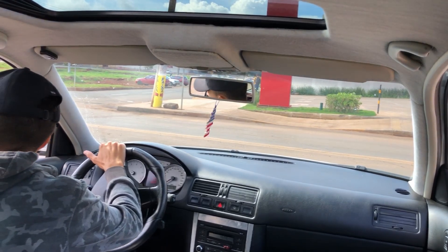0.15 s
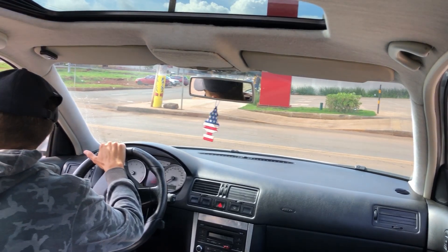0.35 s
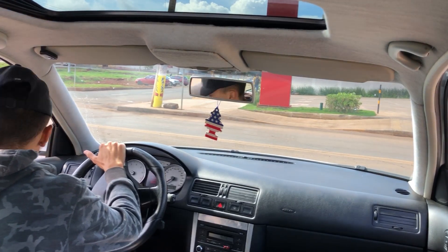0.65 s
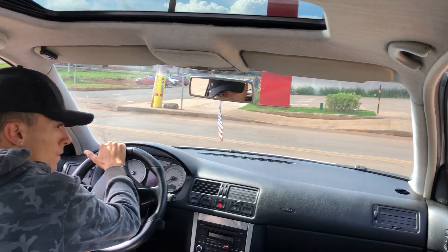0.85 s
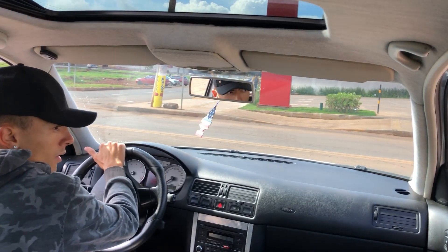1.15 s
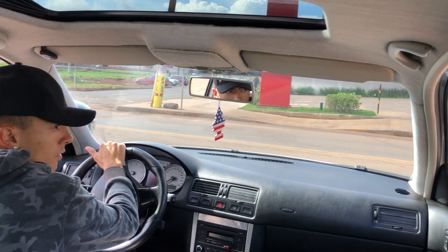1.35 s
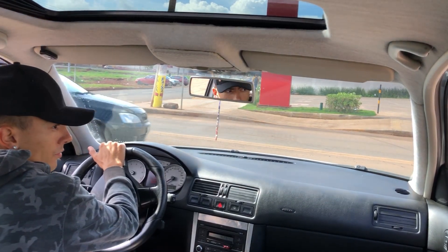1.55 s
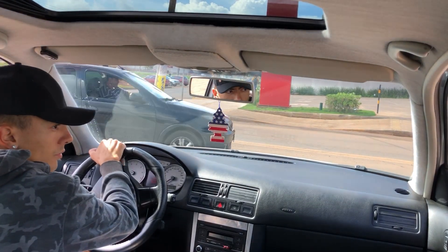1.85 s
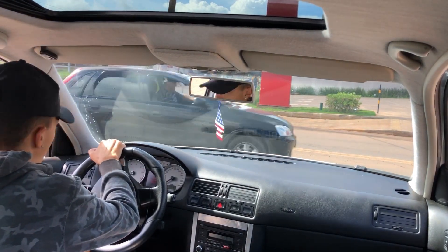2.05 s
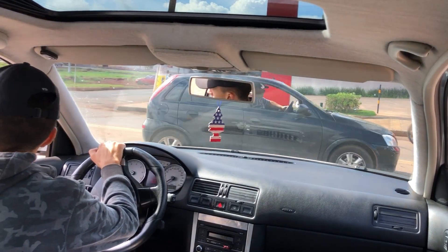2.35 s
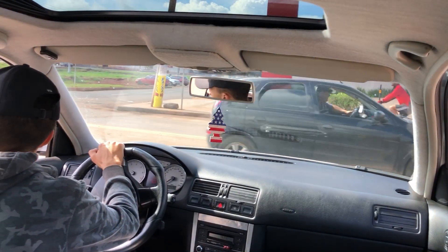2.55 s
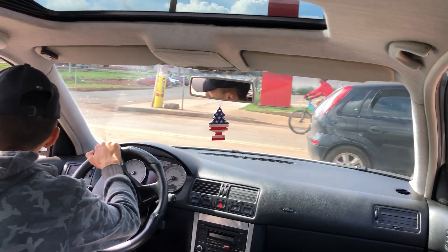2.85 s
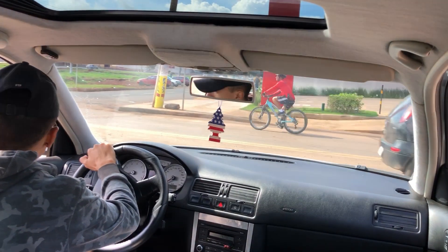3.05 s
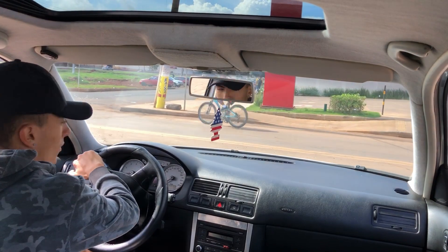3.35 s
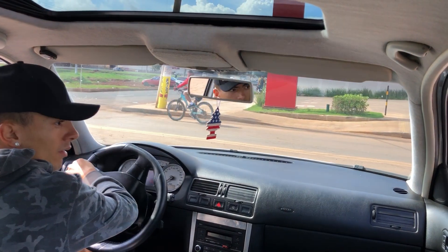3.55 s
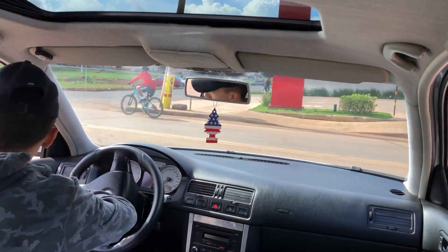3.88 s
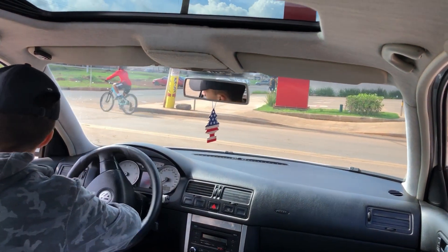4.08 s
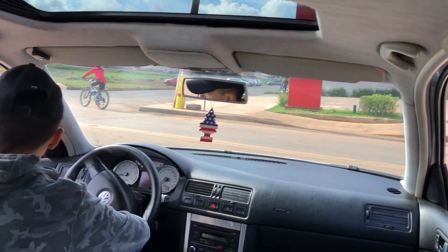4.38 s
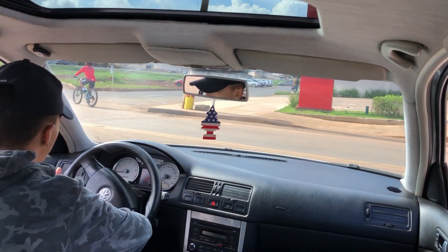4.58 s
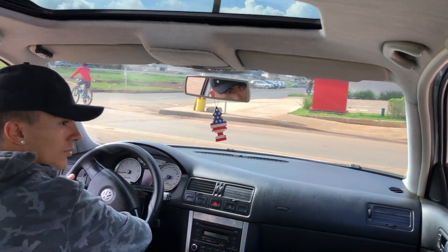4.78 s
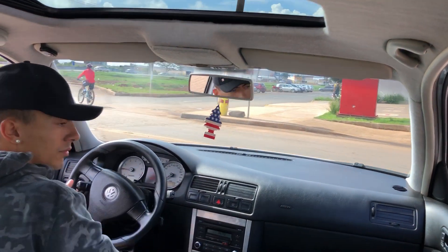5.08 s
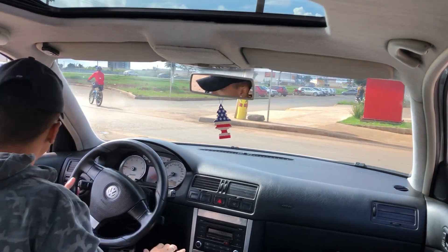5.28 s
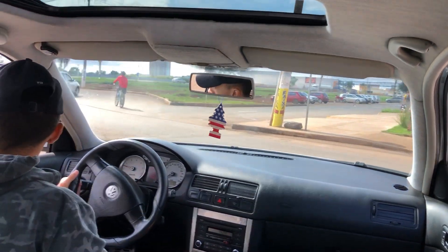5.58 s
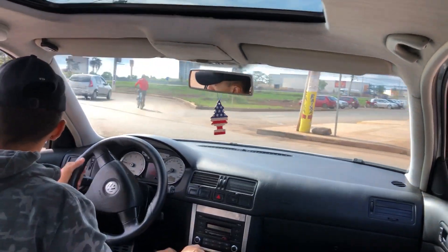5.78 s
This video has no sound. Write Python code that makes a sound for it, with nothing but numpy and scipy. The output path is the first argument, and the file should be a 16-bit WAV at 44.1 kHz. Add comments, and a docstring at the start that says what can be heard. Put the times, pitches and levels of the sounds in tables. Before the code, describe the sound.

Low engine idle in a car cabin beats against a passing car's boom; faint squeaks and clicks, then a swelling, droning pull-off.

```python
"""A deep idle boom fills a small car waiting at a junction, joined by another car's boom that beats against it.
The idle is a set of sines locked to the firings; it revs up into a cabin resonance and pulls away, droning
panels. The crossing car adds a pulsing band of noise; tyres and ventilation are soft coloured noise. Unsteady
sines hum and whine, stick-slip tones squeak, noise bursts click, and dying sines give a low tone and soft
knocks."""
import sys
import numpy as np
from scipy import signal
from scipy.io import wavfile

SR = 44100
rng = np.random.default_rng(int(sys.argv[2]) if len(sys.argv) > 2 else 0)


def wrap_up_sound(samples):
    """Save the sound to the file named by the first command line argument, as 16-bit audio."""
    columns = np.atleast_2d(samples).T
    # keep every value between -1 and 1, then stretch to whole-number steps
    tamed = np.clip(columns, -1, 1)
    steps = np.round(tamed * 32767).astype(np.int16)
    wavfile.write(sys.argv[1], SR, steps)


N = 261072
TIME = np.arange(N) / SR

# colour of the tyre rumble: (frequency [Hz], relative level per Hz [dB])
RUMBLE_COLOUR = [(34, -20), (60, 6), (110, 5), (160, -1), (220, -0.5), (300, -7), (380, -11.5), (500, -11),
                 (700, -28), (1200, -33)]
# colour of the rushing air: (frequency [Hz], relative level per Hz [dB])
RUSH_COLOUR = [(300, 0.5), (500, 3), (660, -3.5), (850, 2), (1080, 0), (1400, -4.5), (2200, -12.5),
               (3800, -16), (6000, -24), (10000, -34.5), (16000, -45)]
# a wavering hum: (time [s], pitch [Hz], level [dB])
HUM_CURVE = [(0, 225.6, -55), (1.3, 224.4, -53), (1.75, 214.1, -45), (2.42, 216, -46.5),
             (2.62, 199.7, -53.5), (2.77, 191, -39), (2.92, 236.8, -59.5), (3.1, 253, -52),
             (3.7, 238.7, -56.5), (4.7, 273.1, -54), (5.2, 257.4, -56)]
# a brief higher hum as the engine gathers speed: (centre [s], half length [s], pitch [Hz], level [dB])
HIGH_HUM_SWELL = (5.79, .075, 490, -49)
# wavering whine near 380 Hz as engine overtones cross a panel resonance: (time [s], pitch [Hz], level [dB])
PANEL_WHINE = [(0, 379, -62), (4.66, 372, -63), (4.76, 381, -51), (4.83, 388, -47), (4.89, 365, -45.5),
               (4.96, 370, -56), (5.05, 378, -54), (5.1, 382, -45), (5.19, 390, -42.5), (5.25, 380, -50),
               (5.33, 376, -46), (5.42, 370, -52), (5.48, 386, -50), (5.62, 366, -55), (5.7, 380, -48),
               (5.8, 376, -44), (5.88, 382, -42.5)]
# brief dying low sines: a low tone at 1.63 s, then two soft knocks: (time [s], level [dB], pitch [Hz], t60 [s])
LOW_DYING_SINES = [(1.63, -29.5, 102, .4), (3.719, -37.5, 315, 0.14), (4.219, -26, 159, 0.097)]
# tyre scrubs: (centre [s], half length [s], level [dB], low edge [Hz], high edge [Hz])
TYRE_SCRUBS = [(2.905, 0.14, -53, 287, 548), (4.5, 0.22, -52, 471, 681.6)]
# trim squeaks, before the treble trim: (centre [s], length scale [s], pitch [Hz], level [dB],
# weight of odd partials [dB], flutter [dB], glide [share of the pitch])
TRIM_SQUEAKS = [(0.225, .05, 435, -50, -20, 2, 0), (0.252, 0.034, 1615, -48.5, -14, 2, -.02),
                (1.03, 0.05, 2112, -50, 1, 2, -.025), (1.249, 0.046, 2046, -42.5, 1, 2, .02),
                (1.3, .035, 2035, -55, -8, 3, .01), (1.447, .04, 612, -48, -20, 2, -.014),
                (1.76, .05, 542, -47, -20, 2, -.014), (3.15, .3, 3660, -67, -20, 4, -.014),
                (4.35, 0.16, 2072, -63, -14, 4.5, 0), (4.46, .035, 2080, -56, -14, 3, 0)]
# plastic clicks, before the treble trim: (time [s], crack level [dB], crack t60 [s], crack low edge [Hz],
# crack high edge [Hz], hollow body level [dB], body low edge [Hz], body high edge [Hz], plastic ring [dB])
PLASTIC_CLICKS = [(1.168, -50, 0.06, 4500, 7500, -42.5, 3450, 4450, -2),
                  (3.5555, -43.5, 0.04, 3000, 15800, -38.5, 2220, 2680, 6),
                  (5.6103, -32.5, 0.01, 1800, 13000, -31, 1250, 3200, -14),
                  (5.635, -59, .05, 3500, 5200, -55, 3000, 5000, -12),
                  (5.701, -53.5, .05, 3500, 12000, -49, 2700, 5000, -6),
                  (5.745, -53.5, .04, 7000, 15500, -54.5, 4900, 6000, -12)]
# modes of the plastic: (frequency [Hz], width [Hz], relative level [dB])
PLASTIC_MODES = [(5850, 280, 1), (6530, 380, 3.5), (8300, 290, -4), (11100, 270, 4.5), (14800, 300, 3)]
# crossing car's hiss, before its puffs and the treble trim: (time [s], level [dB])
PASSING_HISS = [(0.0, -73.5), (0.87, -70), (1.61, -63.5), (2.1, -65.5), (3.05, -61.5), (3.84, -65.5),
                (5.44, -74), (5.92, -72)]
# colour of that hiss: (frequency [Hz], relative level per Hz [dB])
HISS_COLOUR = [(1000, 8), (1800, 4), (2400, -1), (3500, 1), (5000, -2.5), (7300, -6), (10000, -8.5),
               (13000, -12.5), (15500, -4.5)]
# how much faster the crossing car's boom runs than the idle's: (time [s], beat rate [per s])
BEAT_RATE = [(2.6, 3.88), (3.2, 5.64), (3.65, 2.9), (4.5, 2.7)]
# reflections from glass and roof: (delay [s], strength [gain])
CABIN_REFLECTIONS = [(.0023, 0.071), (.0037, -0.22), (.0059, 0.3), (.0086, .18), (0.011, -0.11)]
# engine speed: (time [s], firing rate [per s])
FIRING_RATE = [(0, 26.0), (0.9, 25.9), (1.6, 25.3), (2.75, 26.4), (3.3, 24.8), (3.7, 24.7), (4.3, 25.8),
               (4.6, 25.9), (4.72, 26.5), (4.77, 35.0), (4.86, 36.5), (4.93, 43.5), (5.04, 47.4),
               (5.14, 51.0), (5.38, 50.5), (5.51, 48.0), (5.68, 47.3), (5.74, 50.0), (5.83, 52.4),
               (5.92, 51.0)]
# idle boom, at twice the firing rate, wavers and dips briefly just before the engine revs up:
# (time [s], level [dB])
IDLE_BOOM_LEVEL = [(0, -27.5), (1.5, -26), (2.6, -28), (3.6, -25.5), (4.4, -27), (4.6, -29), (4.71, -25.5)]
# overtones at idle: (multiple of the firing rate, relative level [dB])
IDLE_OVERTONES = [(1, -19), (3, 6), (4, -6), (5, -5.5), (6, -12), (7, -12), (8, -14), (9, -16)]
# main overtones surging in and out of the cabin's resonances while pulling away:
# (time [s], 2nd level [dB], 3rd level [dB], 4th level [dB])
OVERTONE_SURGES = [(4.77, -46, -48, -52), (4.83, -35, -45, -51), (4.89, -34, -42, -53),
                   (4.97, -30, -34.5, -35.5), (5.07, -27.5, -38, -43), (5.22, -33, -53, -46),
                   (5.33, -39, -48, -43), (5.42, -37, -39, -42), (5.49, -30, -39, -39),
                   (5.58, -26, -35.5, -43), (5.69, -26, -44, -44), (5.84, -36, -44, -51)]
# lesser overtones under load, with half steps from unequal cylinders, before the cabin resonance:
# (multiple of the firing rate, level [dB])
LOAD_OVERTONES = [(1.5, -38.5), (2.5, -47), (5, -60), (6, -53.5), (10, -55)]
# panels shaken by the firings: (frequency [Hz], width [Hz], relative level [dB])
PANEL_MODES = [(382.6, 28, 6), (490, 15.6, 4.5), (817, 130, -9)]

# the car begins to creep, and the tyres rumble
RUMBLE_STANDING_DB, RUMBLE_ROLLING_DB, ROLL_START_S, ROLL_RISE_S = -46, -40.5, 1, 1.7
# the crossing car's tyres as its nose goes by
PASSING_RUMBLE_DB, PASSING_RUMBLE_S, PASSING_RUMBLE_HALF_S = -41, 1.77, 0.14
# steady air, then the rush added by the crossing car's tyres
RUSH_DB, PASSING_RUSH_DB, RUSH_NEAREST_S, RUSH_HALF_S = -50.5, -55.5, 1.94, 0.22
WHINE_WAVER, WHINE_FLUTTER_DB = .009, 2.2  # waver is a share of the pitch
SQUEAK_JITTER, SQUEAK_ARCH = .014, .018  # shares of the pitch
BODY_T60_S = 0.03  # ring of the hollow body behind a click
TREBLE_TRIM_DB = -2.1
CANCEL_S = 2.72  # a moment when the two booms are in opposite phase
# the other boom is at half power this long before and after the nearest point
NEAREST_S, NEAR_HALF_S, OTHER_BOOM_DB = 3.35, 0.62, -33
# its overtone an octave up, relative to its boom, heard once its tail has come round
OTHER_SECOND_DB, TAIL_S, TAIL_RISE_S = -6.5, 2.62, 0.2
# the throttle opens and the engine stumbles for about one firing
LOAD_START_S, LOAD_RISE_S = 4.725, 0.035
STUMBLE_S, STUMBLE_HALF_S, STUMBLE_DB = 4.734, .015, -22
# under load the firing rate climbs into this resonance
CABIN_BOOM_HZ, CABIN_BOOM_DB, BOOM_WIDTH_OCTAVES = 49.7, -21, 0.11
IDLE_UNEVEN_DB, LOAD_UNEVEN_DB, OVERTONE_WANDER_DB = .75, 1.5, 1.7
IDLE_OVERTONES_DB = -42  # the idle overtone levels sit on this
STANDING_OVERTONES_DB = -2.5  # upper idle overtones start softer and come up as the car creeps
OVERTONE_LAG_RAD = .3  # higher overtones are delayed more by the body, rounding each pulse
THUD_DB, THUD_T60_S, THUD_LOW_HZ, THUD_HIGH_HZ = -48.5, .05, 95, 190
DRONE_IDLE_DB, DRONE_LOAD_DB, DRONE_RISE_S = -61.5, -49, 0.08  # panel buzz
FIRING_SPREAD_DB, STRONG_WEAK_DB, PANEL_NOISE = 1.5, 4, .7
CUTOFF_HZ = 15800


def from_db(db):
    """Decibels to gain."""
    return 10 ** (np.asarray(db) / 20)


def rms_one(x):
    """Scale to unit power."""
    return x / np.sqrt(np.mean(x ** 2) + 1e-20)


def in_time(rows):
    """Each column of a curve at every sample."""
    times, *columns = np.transpose(rows)
    return [np.interp(TIME, times, column) for column in columns]


def ramp(start_s, rise_s):
    """A straight rise from 0 to 1."""
    return np.clip((TIME - start_s) / rise_s, 0, 1)


def bump(centre_s, half_s):
    """A bell-shaped swell, 1 at its centre."""
    return np.exp(-((TIME - centre_s) / half_s) ** 2)


def nearness(nearest_s, half_s):
    """Gain of a source going past on a straight line, 1 at the nearest point."""
    return 1 / np.hypot(1, (TIME - nearest_s) / half_s)


def dying(start_s, t60):
    """A sudden start and an exponential decay."""
    return (TIME >= start_s) * from_db(-60 * np.clip((TIME - start_s) / t60, 0, 3))


def drift(rate_hz):
    """Slow chance movement with spread 1: noise through two equal low-pass poles."""
    step = 40  # drawn at every 40th sample, then joined by straight lines
    r = np.exp(-2 * np.pi * step * rate_hz / SR)
    noise = rng.standard_normal(N // step + 2002)
    slow = signal.lfilter([1], [1, -2 * r, r * r], noise)[2000:]  # drop the settling
    return np.interp(np.arange(N) / step, np.arange(len(slow)), rms_one(slow))


def turns(hz):
    """Phase in radians of a changing frequency."""
    return 2 * np.pi * np.cumsum(hz) / SR


def band(x, low_hz, high_hz):
    """Gentle band-pass."""
    high_hz = min(max(high_hz, low_hz * 1.1), SR * .47)
    sos = signal.butter(2, [low_hz, high_hz], "band", fs=SR, output="sos")
    return signal.sosfilt(sos, x + 1e-18)


def resonate(x, modes):
    """Ring parallel two-pole resonances, each with its own width and level."""
    out = 0
    for hz, width, db in modes:
        r = np.exp(-np.pi * width / SR)
        poles = [1, -2 * r * np.cos(2 * np.pi * hz / SR), r * r]
        ring = (1 - r * r) / 2 * signal.lfilter([1, 0, -1], poles, x + 1e-18)
        out = out + from_db(db) * ring
    return out


def coloured_noise(spectrum, patchy_db):
    """Bands of noise on a spectrum, each flickering a little; unit power."""
    hz, db = np.transpose(spectrum)
    edges = np.geomspace(hz[0], hz[-1], 15)
    white, out = rng.standard_normal((2, N)), 0
    for k, (low, high) in enumerate(zip(edges, edges[1:])):
        level_db = np.interp(np.log(low * high) / 2, np.log(hz), db)
        flicker_db = patchy_db * drift(17.0)
        # neighbouring bands draw on different noise
        out = out + band(white[k % 2], low, high) * from_db(level_db + flicker_db)
    return rms_one(out)


def burst(start_s, t60, low_hz, high_hz):
    """A dying band of noise that starts near unit power."""
    noise = rng.standard_normal(N) * dying(start_s, t60)
    return band(noise, low_hz, high_hz) * np.sqrt(SR / 2 / max(high_hz - low_hz, 100))


def tone(hz, db, waver, flutter_db):
    """A slightly unsteady sine of given pitch and level."""
    phase = turns(hz * (1 + waver * drift(11.4)))
    return from_db(db + flutter_db * drift(17)) * rms_one(np.sin(phase))


def partial(phase):
    """A sine of unit power at a chance starting phase."""
    return rms_one(np.sin(phase + rng.uniform(0, 2 * np.pi)))


def overtone(phase, multiple, db):
    """One partial locked to the firings, its level wandering a little."""
    wave = np.cos(multiple * phase - OVERTONE_LAG_RAD * multiple ** 2)
    return from_db(db + OVERTONE_WANDER_DB * drift(16)) * rms_one(wave)


def road():
    """Tyre rumble through the floor and a rush of air; both swell as the other car goes by."""
    rolling = ramp(ROLL_START_S, ROLL_RISE_S)
    own_rumble_db = RUMBLE_STANDING_DB + rolling * (RUMBLE_ROLLING_DB - RUMBLE_STANDING_DB)
    passing_rumble = from_db(PASSING_RUMBLE_DB) * nearness(PASSING_RUMBLE_S, PASSING_RUMBLE_HALF_S)
    passing_rush = from_db(PASSING_RUSH_DB) * nearness(RUSH_NEAREST_S, RUSH_HALF_S)
    # unrelated noises add by power
    rumble_gain = np.hypot(from_db(own_rumble_db), passing_rumble)
    rush_gain = np.hypot(from_db(RUSH_DB), passing_rush)
    rumble = band(coloured_noise(RUMBLE_COLOUR, patchy_db=1.04), 31.4, 3000)
    return rumble_gain * rumble + rush_gain * coloured_noise(RUSH_COLOUR, patchy_db=1.6)


def wavering_hum():
    """A soft sine whose pitch and level wander along a curve."""
    return tone(*in_time(HUM_CURVE), waver=0.0167, flutter_db=2.0)


def high_hum():
    """A second sine swells briefly above the panel whine in pitch."""
    centre_s, half_s, hz, db = HIGH_HUM_SWELL
    return bump(centre_s, half_s) * tone(hz, db, waver=WHINE_WAVER, flutter_db=WHINE_FLUTTER_DB)


def panel_whine():
    """An unsteady sine near 380 Hz stands for engine overtones crossing a panel resonance."""
    return tone(*in_time(PANEL_WHINE), waver=WHINE_WAVER, flutter_db=WHINE_FLUTTER_DB)


def scrubs():
    """The front tyres scrub softly as they are steered at a crawl: swells of band noise."""
    out = 0
    for centre_s, half_s, db, low, high in TYRE_SCRUBS:
        noise = rms_one(band(rng.standard_normal(N), low, high))
        out = out + from_db(db) * bump(centre_s, half_s) * noise
    return out


def low_dying_sines():
    """Brief dying low sines: a low tone, then soft knocks."""
    out = 0
    for start_s, db, hz, t60 in LOW_DYING_SINES:
        out = out + from_db(db) * dying(start_s, t60) * np.sin(2 * np.pi * hz * (TIME - start_s))
    return out


def squeaks():
    """Trim rubbing in fluttering stick-slip tones that arch in pitch, strongest on the second partial."""
    out = np.zeros(N)
    for centre_s, length, hz, db, odd_db, flutter_db, glide in TRIM_SQUEAKS:
        since = TIME - centre_s
        swell = np.cos(np.pi * np.clip(since / (length * 1.35), -.5, .5)) ** 2
        bend = SQUEAK_JITTER * drift(227) + SQUEAK_ARCH * (swell - 1) + glide * np.tanh(since / length)
        phase = turns(hz * (1 + bend))
        odd = from_db(-11) * np.sin(phase) + from_db(-17) * np.sin(3 * phase)
        even = np.sin(2 * phase) + from_db(-17) * np.sin(4 * phase)
        out += from_db(db + flutter_db * drift(90)) * swell * (even + from_db(odd_db) * odd)
    return out


def clicks():
    """Short noise cracks of the controls over a hollow body, each exciting the plastic's modes."""
    out = 0
    for start_s, db, t60, low, high, body_db, body_low, body_high, ring_db in PLASTIC_CLICKS:
        crack = from_db(db) * burst(start_s, t60, low, high)
        body_burst = burst(start_s, BODY_T60_S, body_low, body_high)
        body = from_db(body_db) * band(body_burst, body_low, body_high)
        out = out + crack + body + from_db(ring_db) * resonate(crack, PLASTIC_MODES)
    return out


def other_phase():
    """The crossing car's engine runs a few beats a second above the idle boom, one turn per firing."""
    firing_hz, = in_time(FIRING_RATE)
    beat_hz, = in_time(BEAT_RATE)
    idle_hz = np.interp(np.minimum(TIME, LOAD_START_S), TIME, firing_hz)  # held once the throttle opens
    beats = np.cumsum(beat_hz) / SR
    beats_from_cancel = beats - np.interp(CANCEL_S, TIME, beats)
    return 2 * np.pi * (2 * np.cumsum(idle_hz) / SR + beats_from_cancel + .5)


def crossing_hiss(phase):
    """Hiss that puffs twice in each engine cycle of four firings."""
    hiss_db, = in_time(PASSING_HISS)
    cycle = phase / (8 * np.pi) % 1
    puff_db = np.interp(cycle, [0, .1, .4, .7, 1], [2.5, 9.3, 6.0, 9.4, 5.5])
    level_db = hiss_db + 2.0 + puff_db + 1.14 * drift(60)
    return from_db(level_db) * coloured_noise(HISS_COLOUR, patchy_db=1.7)


def crossing_boom(phase):
    """The other engine's boom swells and fades with distance, gaining an octave behind it."""
    octave_gain = ramp(TAIL_S, TAIL_RISE_S) * from_db(OTHER_SECOND_DB + 3.2 * drift(7.5))
    boom = rms_one(np.cos(phase)) + octave_gain * partial(2 * phase)
    return from_db(OTHER_BOOM_DB) * nearness(NEAREST_S, NEAR_HALF_S) * boom


def cabin(x):
    """Close reflections from glass and roof ripple the spectrum."""
    return x + sum(gain * np.interp(TIME - delay, TIME, x, left=0) for delay, gain in CABIN_REFLECTIONS)


def firing_phase():
    """One turn per firing."""
    firing_hz, = in_time(FIRING_RATE)
    return turns(firing_hz)


def cabin_resonance():
    """The cabin answers most strongly when the firing rate meets its own boom frequency."""
    firing_hz, = in_time(FIRING_RATE)
    return 1 / np.hypot(1, np.log2(firing_hz / CABIN_BOOM_HZ) / BOOM_WIDTH_OCTAVES)


def engine_boom(phase, load):
    """The boom passes from twice the firing rate at idle to the firing rate itself under load."""
    idle_db, = in_time(IDLE_BOOM_LEVEL)
    idle = from_db(idle_db + IDLE_UNEVEN_DB * drift(31)) * rms_one(np.cos(2 * phase))
    pulling = from_db(CABIN_BOOM_DB + LOAD_UNEVEN_DB * drift(30)) * rms_one(np.cos(phase))
    return (1 - load) * idle + load * cabin_resonance() * pulling


def engine_overtones(phase, load):
    """Partials in step with the firings, one set at idle and a surging set under load."""
    creep_db = STANDING_OVERTONES_DB * (1 - ramp(ROLL_START_S, ROLL_RISE_S))
    idling = sum(overtone(phase, multiple, IDLE_OVERTONES_DB + db + creep_db * (multiple > 3))
                 for multiple, db in IDLE_OVERTONES)
    surging = sum(overtone(phase, multiple, db) for multiple, db in enumerate(in_time(OVERTONE_SURGES), 2))
    lesser = sum(overtone(phase, multiple, db) for multiple, db in LOAD_OVERTONES)
    return (1 - load) * idling + load * (surging + cabin_resonance() * lesser)


def firing_thuds(phase):
    """Each firing starts a dying burst of low noise."""
    firing_hz, = in_time(FIRING_RATE)
    since_firing_s = phase / (2 * np.pi) % 1 / firing_hz
    noise = rng.standard_normal(N) * from_db(-60 * since_firing_s / THUD_T60_S)
    return from_db(THUD_DB) * rms_one(band(noise, THUD_LOW_HZ, THUD_HIGH_HZ))


def panel_drone(phase):
    """Uneven firing impulses and noise shake the panels' resonances, louder under load."""
    impulses = np.diff(np.floor(phase / (2 * np.pi)), prepend=0)
    strength_db = FIRING_SPREAD_DB * drift(51) + STRONG_WEAK_DB * np.cos(phase / 2)  # strong, weak, strong
    shake = rms_one(impulses * from_db(strength_db)) + PANEL_NOISE * rng.standard_normal(N)
    level_db = DRONE_IDLE_DB + ramp(LOAD_START_S, DRONE_RISE_S) * (DRONE_LOAD_DB - DRONE_IDLE_DB)
    return from_db(level_db) * rms_one(band(resonate(shake, PANEL_MODES), 267, 960))


def engine(phase):
    """Boom, overtones and thuds dip together in the stumble; the panels drone on through it."""
    load = ramp(LOAD_START_S, LOAD_RISE_S)
    stumble = from_db(STUMBLE_DB * bump(STUMBLE_S, STUMBLE_HALF_S))
    firing_sound = engine_boom(phase, load) + engine_overtones(phase, load) + firing_thuds(phase)
    return stumble * firing_sound + panel_drone(phase)


def scene():
    """Everything as it reaches the back seat; hiss, squeaks and clicks carry the cabin's reflections."""
    other = other_phase()
    background = road() + wavering_hum() + high_hum() + panel_whine()
    treble = from_db(TREBLE_TRIM_DB) * cabin(squeaks() + clicks() + crossing_hiss(other))
    engines = crossing_boom(other) + engine(firing_phase())
    return (background + scrubs() + low_dying_sines() + treble + engines)[None]


def record(dry):
    """A soft start; the top is cut steeply."""
    low_pass = signal.ellip(12, .1, 90, CUTOFF_HZ, fs=SR, output="sos")
    return signal.sosfilt(low_pass, dry * ramp(0, .012))


dry = scene()
out = record(dry)
wrap_up_sound(out)
```